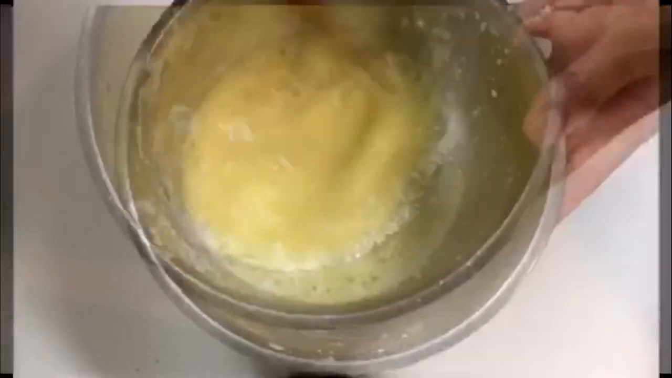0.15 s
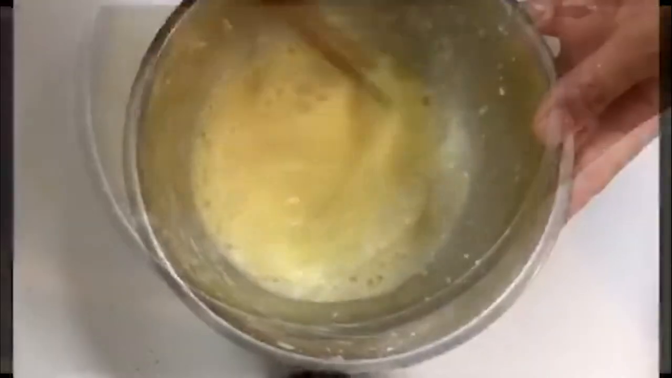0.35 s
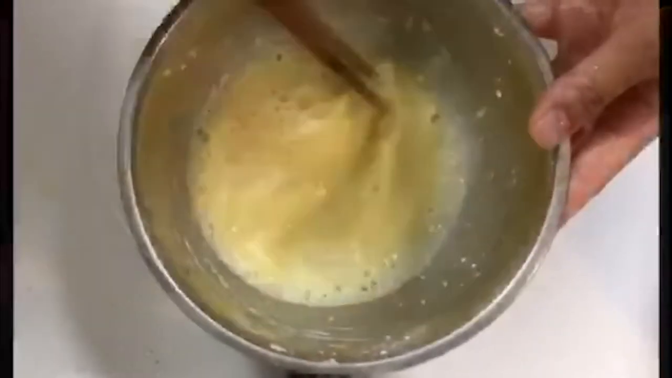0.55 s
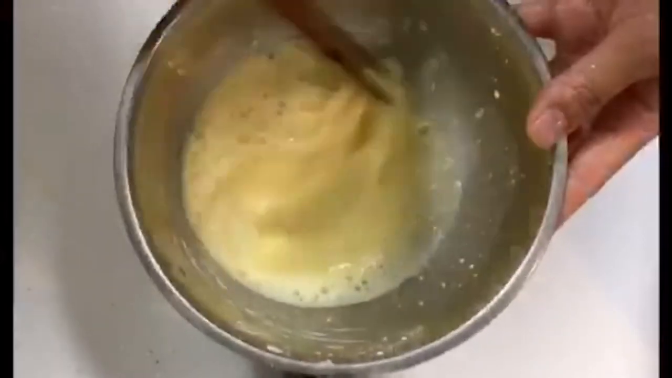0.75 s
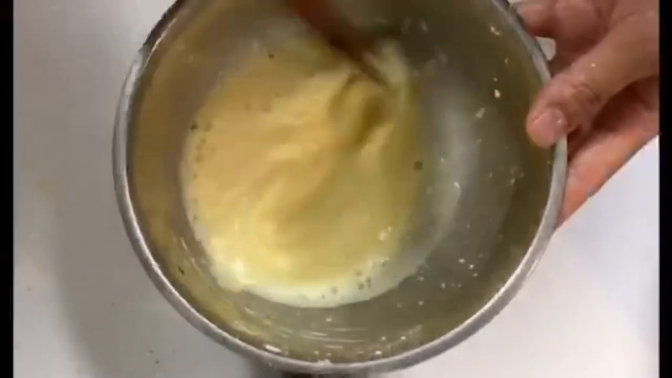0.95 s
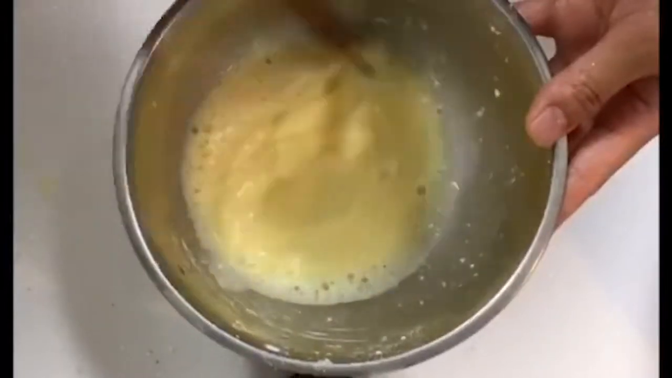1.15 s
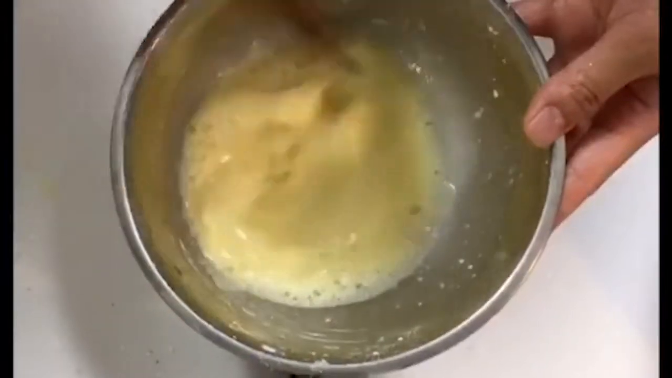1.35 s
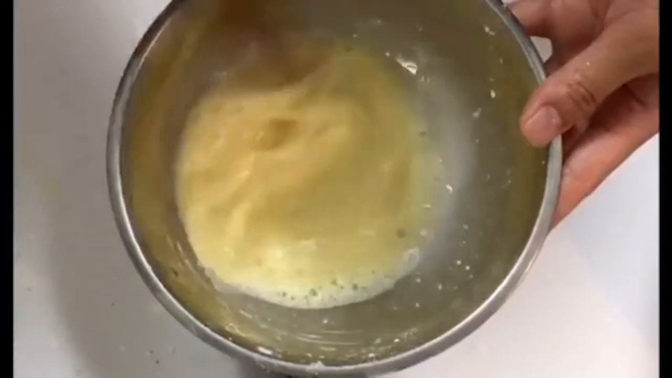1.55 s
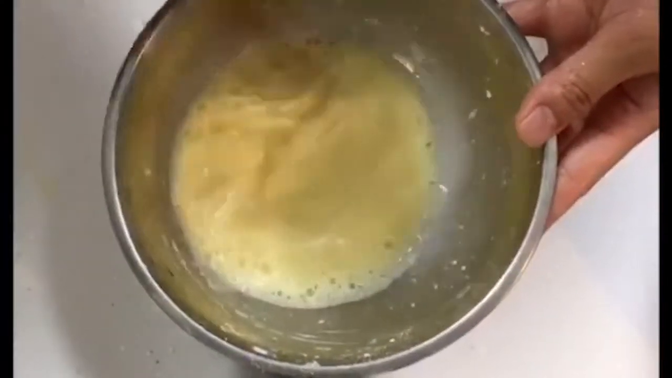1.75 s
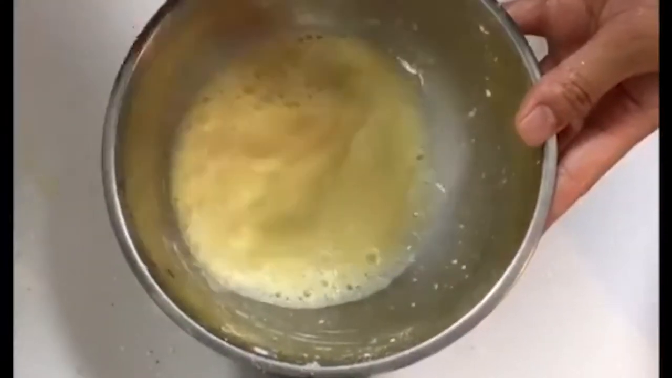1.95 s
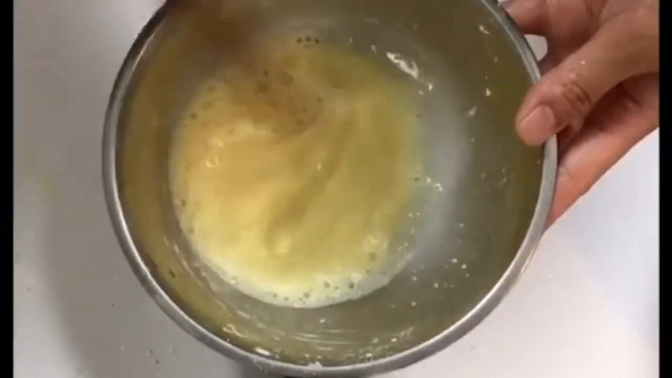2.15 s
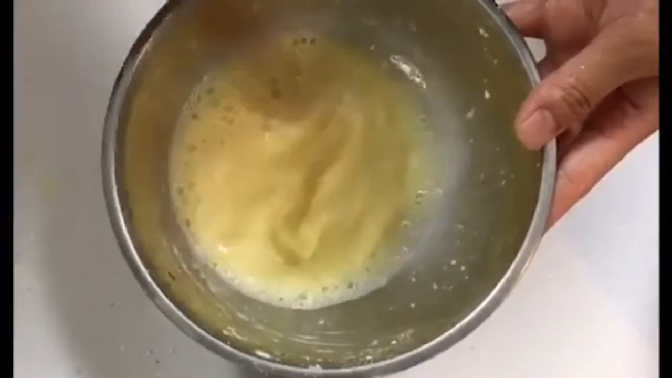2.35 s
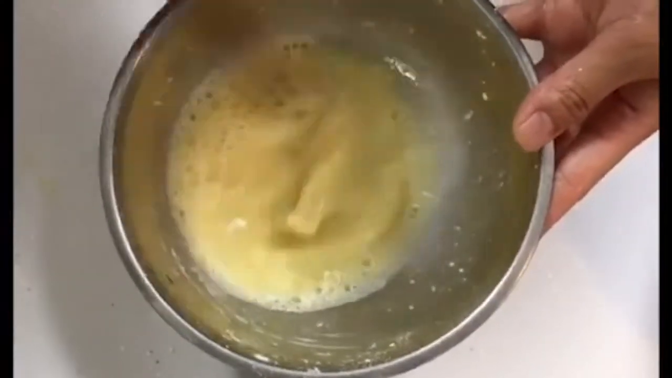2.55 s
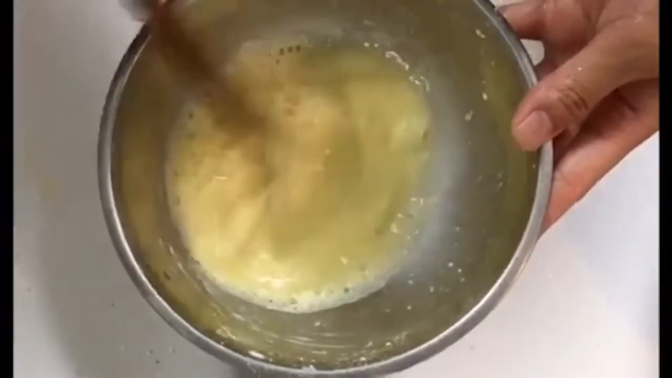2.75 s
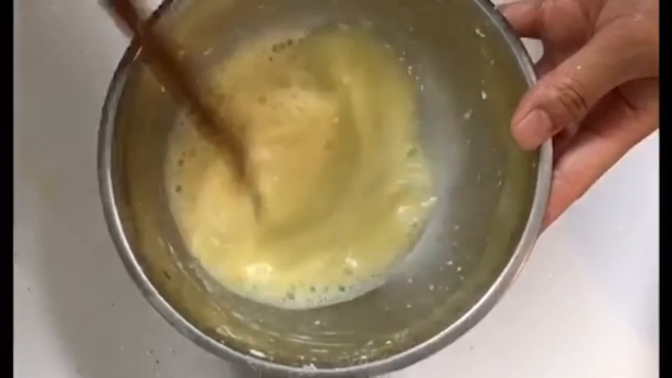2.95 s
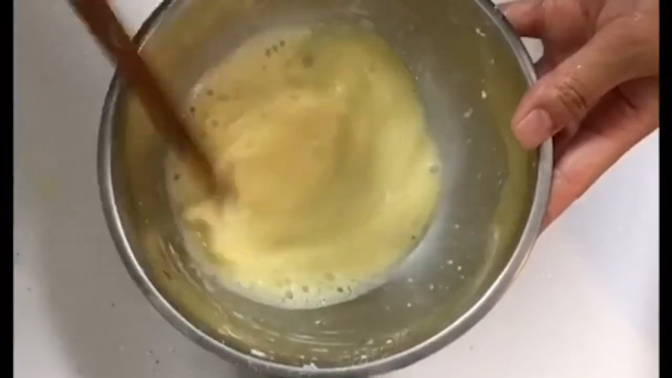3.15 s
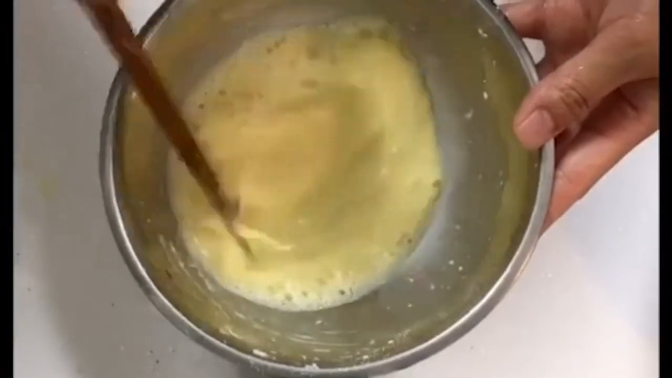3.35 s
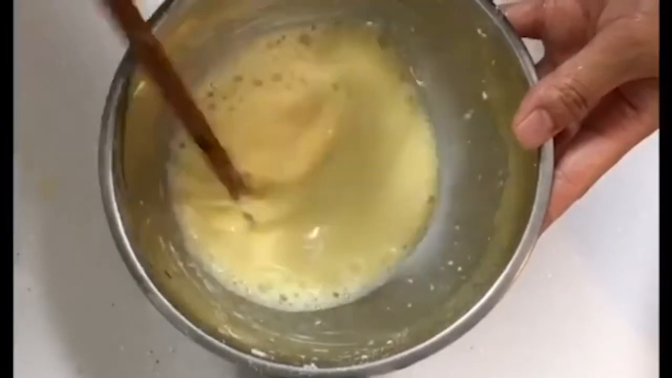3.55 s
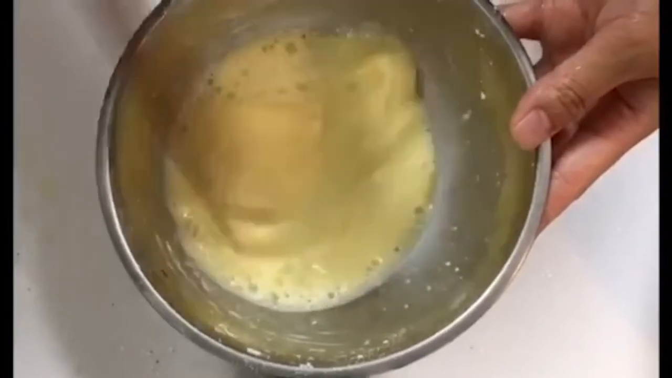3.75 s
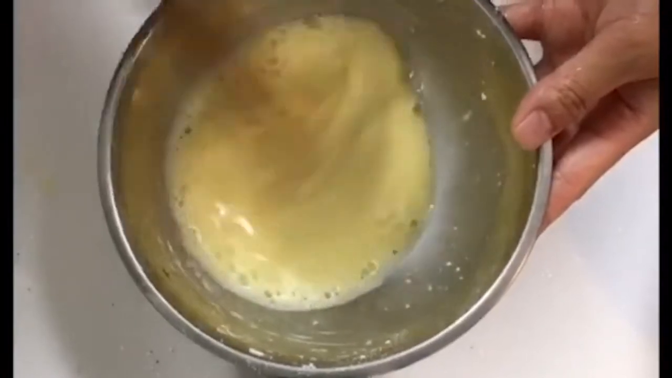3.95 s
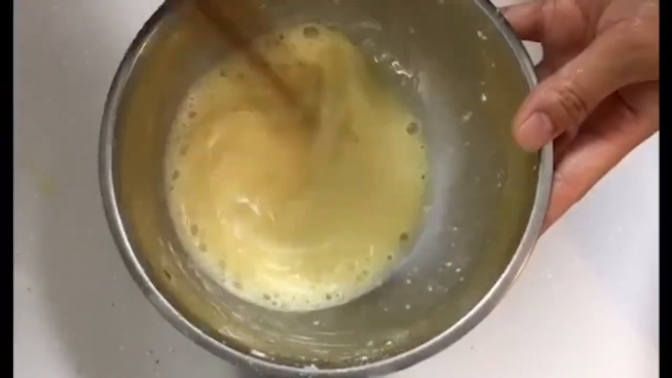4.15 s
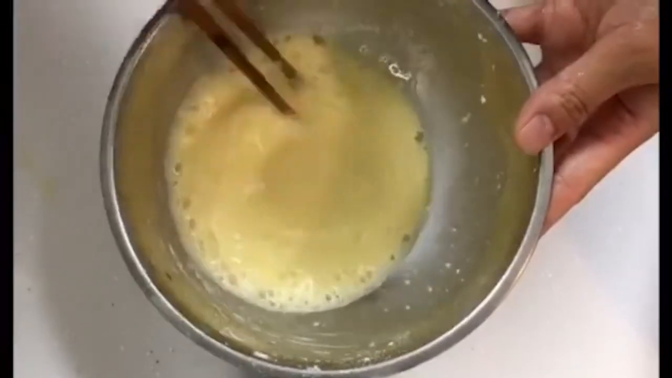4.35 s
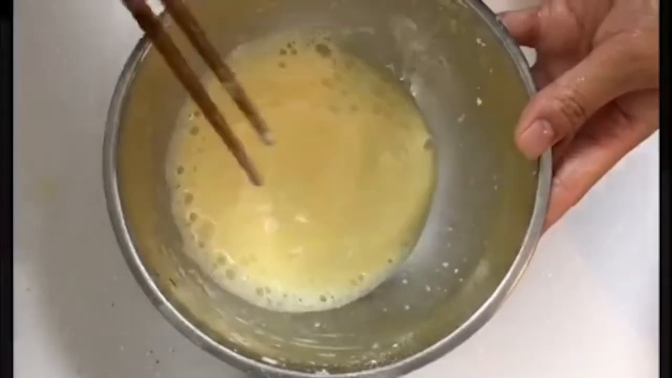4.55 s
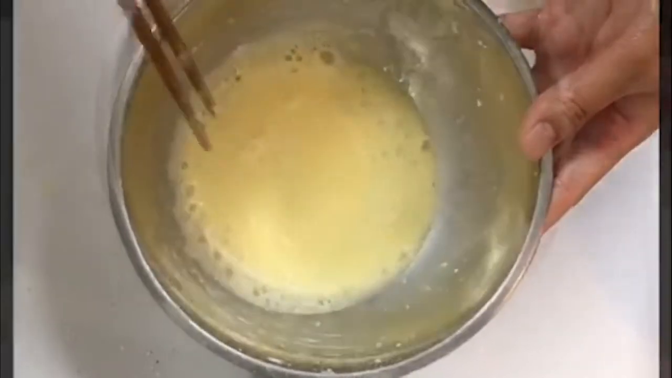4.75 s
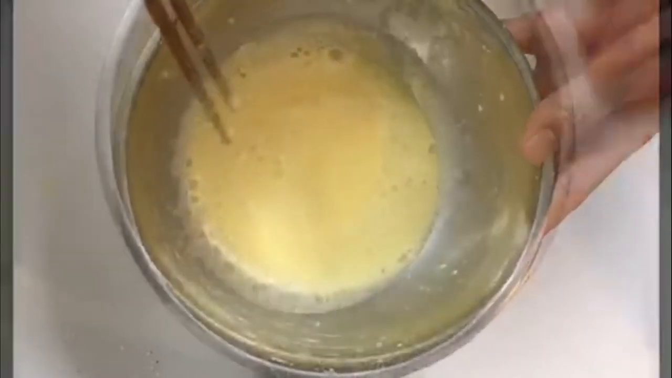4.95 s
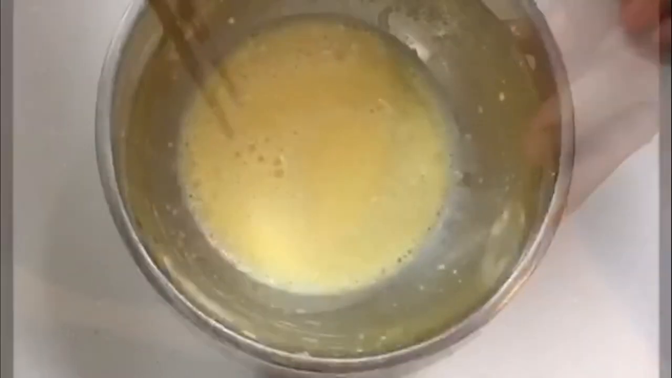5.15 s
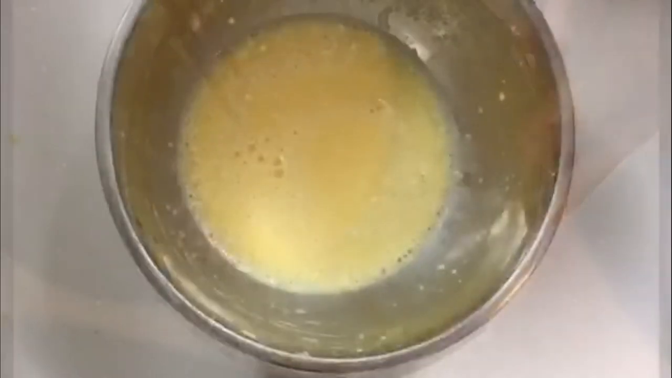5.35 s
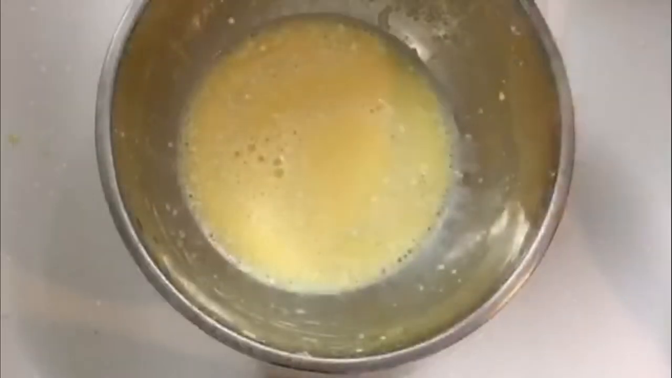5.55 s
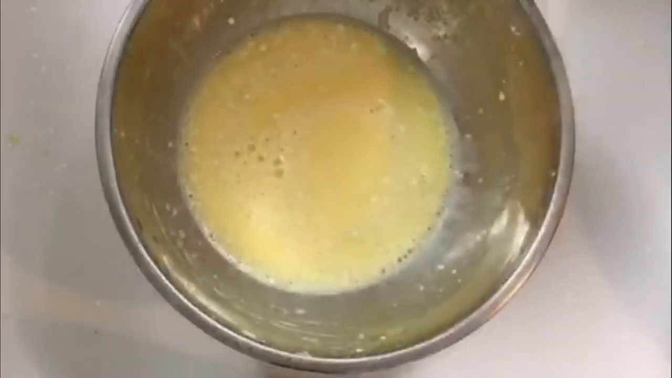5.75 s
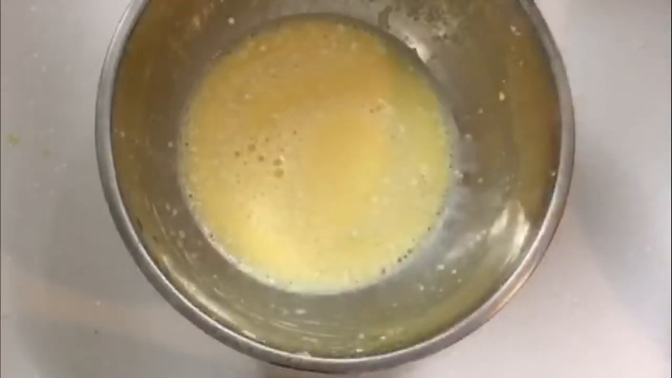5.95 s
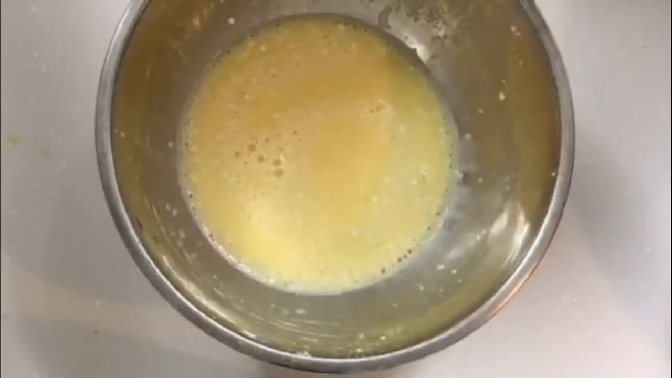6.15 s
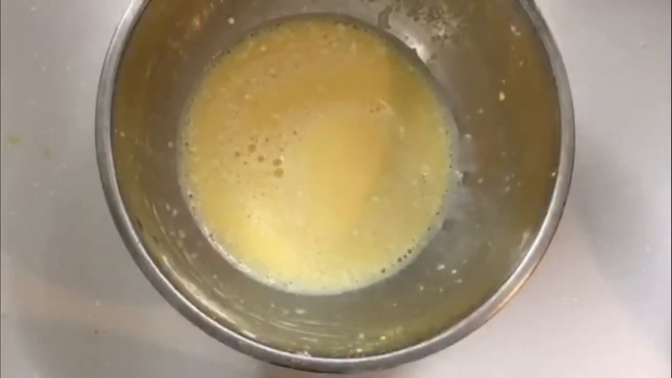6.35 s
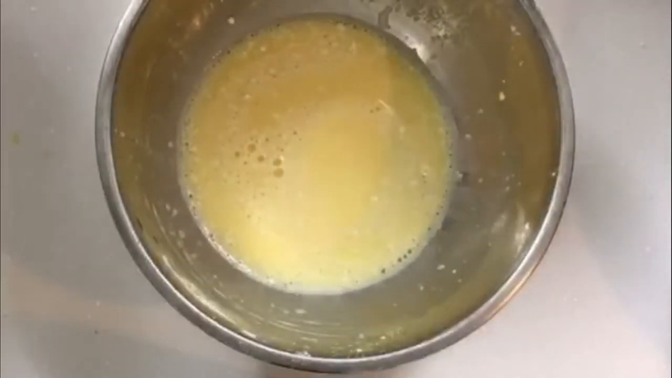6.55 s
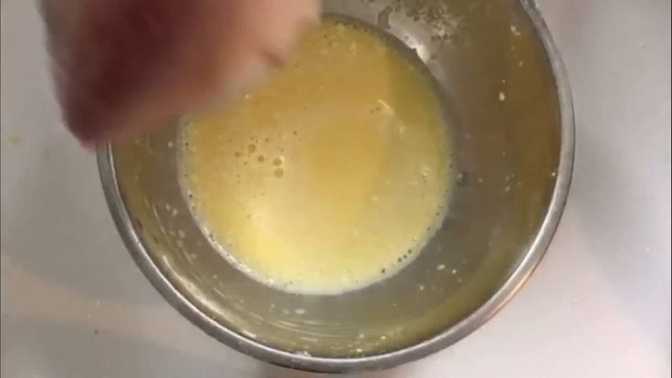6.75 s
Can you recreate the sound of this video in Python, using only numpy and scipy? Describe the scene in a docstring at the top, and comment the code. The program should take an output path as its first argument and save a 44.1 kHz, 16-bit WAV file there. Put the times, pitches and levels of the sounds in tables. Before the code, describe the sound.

Close, quick clacking of chopsticks against a damped metal bowl of wet batter for four seconds, then a few soft taps and quiet kitchen hum.

```python
"""A small kitchen: wooden chopsticks beat thin batter in a hand-held steel bowl, heard from close by.
In each turn the tips knock the damped bowl on entering, plunging and lifting out: noise cracks, ringing modes, low booms.
Folded-in air plops as gliding tones; the wet film snaps and crackles in short noise clicks over a swish of filtered noise.
The beating stops, a few light wooden taps follow, and an appliance hums on over rumble, hiss and one faint brushing."""
import sys
import numpy as np
from scipy import signal
from scipy.fft import rfft, irfft, next_fast_len
from scipy.io import wavfile
from scipy.ndimage import map_coordinates

SR = 44100
rng = np.random.default_rng(int(sys.argv[2]) if len(sys.argv) > 2 else 0)


def wav_out(sig):
    """Save sig, one row per channel (or a flat mono array), as 16-bit PCM at SR to the path in sys.argv[1]."""
    wavfile.write(sys.argv[1], SR, np.round(np.clip(np.atleast_2d(sig).T, -1, 1) * 32767).astype(np.int16))


N = 299868  # length of the scene in samples
T = np.arange(SR // 3) / SR  # the life of one sound [s]

# turns of the chopsticks; in each they enter against the wall, plunge to the bottom and lift out along the far side:
# (time [s], entry level [dB], plunge delay [s], plunge level [dB], lift delay [s], lift level [dB],
#  counter thud level [dB]); the levels are relative
TURNS = [(0.068, -37.5, .048, -34.5, 0.1, -36.5, -45.5), (0.266, -46, 0.055, -29.5, 0.11, -40, -40),
         (0.464, -37.5, 0.051, -30, 0.12, -34, -43.5), (0.661, -30.5, 0.044, -40.5, 0.11, -28, -46),
         (0.859, -29.5, 0.057, -26.5, 0.11, -32.5, -43), (1.067, -32, .055, -29.5, 0.1, -37, -42.5),
         (1.276, -30, .054, -29.5, 0.11, -43, -47), (1.475, -29, 0.07, -32, 0.14, -48, -48),
         (1.681, -29.5, 0.062, -30.5, 0.14, -37.5, -45.5), (1.881, -28, 0.061, -33, 0.12, -28, -41),
         (2.096, -29.5, .054, -30.5, 0.11, -31, -39), (2.293, -31, .043, -29.5, 0.11, -30.5, -41.5),
         (2.495, -33, 0.07, -40, 0.11, -29, -41), (2.700, -33.5, 0.058, -37, .123, -28, -43),
         (2.931, -32.5, 0.049, -40, .110, -39.5, -42), (3.150, -31, 0.061, -29.5, 0.13, -39.5, -40),
         (3.365, -29.5, .051, -29.5, 0.12, -37, -44), (3.57, -32.5, 0.055, -41, 0.11, -35.5, -49),
         (3.796, -33.5, .049, -31.5, 0.088, -43, -37.5), (4.011, -31.5, 0.054, -40.5, 0.15, -57, -48)]


def amp(db):
    """Turn decibels into a gain."""
    return 10 ** (np.asarray(db) / 20)


def unit(x):
    """Scale a sound to rms 1."""
    return x / np.sqrt(np.mean(x ** 2) + 1e-20)


def onset_unit(x):
    """Scale a hit so that its first 20 ms have rms 1."""
    return x / np.sqrt(np.mean(x[:SR // 50] ** 2) + 1e-20)


def along(points, hz):
    """Read a curve of (frequency [Hz], value) points on a log frequency axis."""
    f, v = np.transpose(points)
    return np.interp(np.log(hz + 1), np.log(f + 1), v)


def fade(t60):
    """Die away exponentially, by 60 dB in t60 seconds."""
    return amp(-60 * T / t60)


def coloured(x, spectrum):
    """Filter a sound to a given spectrum, with no sound ahead of its cause (minimum phase)."""
    m = 2 * next_fast_len(len(x) // 2 + 2048)
    gain = amp(along(spectrum, np.fft.rfftfreq(m, 1 / SR)))
    cepstrum = irfft(np.log(gain))
    # folding the cepstrum onto positive times makes the filter causal
    cepstrum[1:m // 2] *= 2
    cepstrum[m // 2 + 1:] = 0
    response = np.exp(rfft(cepstrum))
    return irfft(rfft(x, m) * response)[:len(x)]


def wobble(rate, size):
    """Draw a smooth random curve with rate knots a second."""
    knots = rng.standard_normal(int(size * rate / SR) + 4)
    return map_coordinates(knots, [np.arange(size) * rate / SR])


def add(track, s, sound):
    """Mix a sound into the track at time s."""
    part = track[max(round(s * SR), 0):][:len(sound)]
    part += sound[:len(part)]


def burst(spectrum, t60, tail_db, tail_t60):
    """A crack of noise followed by its weaker, longer scatter from nearby surfaces."""
    envelope = fade(t60) + amp(tail_db) * fade(tail_t60)
    return coloured(rng.standard_normal(len(T)) * envelope, spectrum)


def ring(modes, spread_db, detune):
    """Modes (decaying sines) struck at a new spot and under a new load each time."""
    hz, db, t60 = np.transpose(modes)[:, :, None]
    size, shift, phase = rng.standard_normal((3, len(modes), 1))
    waves = np.sin(2 * np.pi * (hz * (1 + detune * shift) * T + phase))
    levels = amp(db + spread_db * size)
    soft_start = 1 - fade(0.0036)
    return onset_unit(np.sum(levels * fade(t60) * waves, axis=0) * soft_start)


def boom(hz, rise, t60, waver):
    """A low resonance under a shifting load: it swells for a few cycles, then dies; envelope peak 1."""
    swell = (1 - np.exp(-(T / rise) ** 2)) * fade(t60)
    pitch = hz * (1 + waver * wobble(70, len(T)))
    return swell / swell.max() * np.sin(2 * np.pi * np.cumsum(pitch) / SR)


def bubble(hz, life, glide, waver):
    """An air pocket rings with an unsteady, rising pitch; its damping grows as it collapses."""
    age = T / life
    pitch = hz * (1 + glide * (np.minimum(age, 1) - .15) + waver * wobble(520, len(T)))
    dying = amp(-28 * age - 66 * age ** 2)  # 94 dB down at the end of its life
    return np.sin(2 * np.pi * np.cumsum(pitch) / SR) * dying * (1 - fade(0.004))


def tilted(rows, slope):
    """Harder contacts are brighter: tilt the level column around 1.5 kHz, in dB per octave."""
    return [(hz, db + slope * np.log2(hz / 1500), *rest) for hz, db, *rest in rows]


def knocks():
    """Every contact finds the bowl seated a little differently and under a new load of batter."""
    bottom_hz, load_spread = 346, 0.032  # pitch of the bottom, and its relative scatter as the batter shifts
    thud_spread_db = 1.5  # the bowl sits more or less firmly
    out = np.zeros(N)
    for s, db, bottom_db, thud_db, hardness in contacts():
        seat, load = rng.standard_normal(2)
        loaded_hz = bottom_hz * (1 + load_spread * load)
        out += knock(s, db, bottom_db, thud_db + thud_spread_db * seat, hardness, loaded_hz)
    return out


def contacts():
    """List three contacts a turn: (time [s], wall, bottom and thud levels [dB], hardness [dB per octave])."""
    # the plunges soften as the hand slackens: (time [s], hardness [dB per octave])
    plunge_hardness = [(0, 1.5), (3.35, 0), (3.62, -8.5), (4.1, -4)]
    # how much each contact also stirs the other part of the bowl
    entry_flex_db, plunge_wall_db, lift_flex_db = -5.5, -1.5, -12.5
    lift_thud_db = -12  # the lifting tips hardly press the bowl down
    rows = []
    for s, entry_db, plunge_s, plunge_db, lift_s, lift_db, thud_db in TURNS:
        hardness = np.interp(s + plunge_s, *np.transpose(plunge_hardness))
        rows += [(s, entry_db, entry_db + entry_flex_db, min(thud_db, entry_db), 0),
                 (s + plunge_s, plunge_db + plunge_wall_db, plunge_db, thud_db, hardness),
                 (s + lift_s, lift_db, lift_db + lift_flex_db, thud_db + lift_thud_db, 0)]
    return rows


def knock(s, db, bottom_db, thud_db, hardness, bottom_hz):
    """A contact rings the wall, flexes the loaded bottom and thuds into the counter."""
    # spectrum of wood meeting steel: (frequency [Hz], relative level [dB])
    contact_spectrum = [(60, -31.5), (200, 1.5), (400, -5), (600, -11.5), (900, 7), (1500, -1.5), (2100, 1),
                        (3000, -3.5), (4500, -10.5), (7000, -23), (16000, -43.5)]
    # steel wall, damped by batter and hand: (frequency [Hz], relative level [dB], time to fall 60 dB [s])
    wall_modes = [(453.3, -2, 0.13), (866, -3.5, 0.21), (999, -4, 0.11), (1188, 3, 0.081),
                  (1364, -4.5, 0.1), (1516, -15, 0.29), (1810, -21.5, 0.11), (2031, 2.5, 0.072),
                  (2260, -11.5, .11), (2809, 3.5, 0.049), (3520, -10.5, .09), (3810, -14, .09)]
    # spectrum of the bottom under its load of batter: (frequency [Hz], relative level [dB])
    loaded_spectrum = [(100, -42.5), (220, -6), (300, 0.5), (370, 3.5), (470, -8), (600, -18), (750, -1),
                       (1100, -40), (2500, -66)]
    out = np.zeros(N)
    colour = tilted(contact_spectrum, hardness)
    crack = onset_unit(burst(colour, t60=0.031, tail_db=-32.5, tail_t60=0.2))
    wall = ring(tilted(wall_modes, hardness), spread_db=4.0, detune=0.0151)
    add(out, s, amp(db) * (amp(-7.0) * crack + amp(-7.0) * wall))
    # the second chopstick lands a moment after the first
    second = onset_unit(burst(colour, t60=0.012, tail_db=-20, tail_t60=0.13))
    add(out, s + .003 + 0.0072 * rng.random(), amp(db - 12.0) * second)
    flex = boom(bottom_hz, rise=.012, t60=.08, waver=.04)
    add(out, s, amp(bottom_db + 2.0) * flex)
    slap = onset_unit(burst(loaded_spectrum, t60=.08, tail_db=-17, tail_t60=0.19))
    add(out, s + 0.0038, amp(bottom_db - 13.5) * slap)
    thud = boom(hz=92, rise=.014, t60=.15, waver=.11)
    add(out, s, amp(thud_db + 6.0) * thud)
    return out


def plops():
    """Loud air pockets open; each turn also brings a splash at the entry and, but for the last, a weak wake."""
    # the loudest air pockets opening in the batter: (time [s], relative level [dB], pitch [Hz])
    pockets = [(0.1725, -20, 1985), (0.4667, -26, 1260), (0.6603, -13.5, 2280), (0.7769, -14.5, 2810),
               (0.7776, -15.5, 2100), (0.8116, -29.5, 1220), (0.8582, -14.5, 3390), (0.864, -23, 1186),
               (0.952, -26.5, 2280), (0.9752, -20.5, 2150), (1.2194, -23, 1200), (1.3064, -23.5, 2230),
               (1.423, -17, 992), (1.634, -30, 1590), (1.7756, -24.5, 2600), (1.8189, -27.5, 1313),
               (1.9988, -16.5, 1824), (2.018, -24.5, 1620), (2.039, -29, 1320), (2.0669, -23.5, 1340),
               (2.2053, -15, 2690), (2.2281, -22, 1000), (2.4044, -18.5, 2080), (2.6018, -10.5, 2854),
               (2.6058, -15, 2105), (2.6993, -23, 1970), (2.7092, -19.5, 1223), (2.9001, -30, 1314),
               (2.9317, -21.5, 1020), (3.121, -24, 3400), (3.3073, -17, 1199), (3.4994, -23, 2800),
               (3.7248, -30.5, 1830), (3.7742, -24, 2900)]
    splash_db, splash_hz = 7.5, 3453  # small pockets that the entering tips drive under; against the entry level
    # weak pockets behind the tips: start after the entry, span, top level
    wake_s, wake_length_s, wake_db = .095, .065, -28.5
    out = np.zeros(N)
    for s, db, hz in pockets:
        add(out, s, amp(db - 1.0) * plop(hz, length=1))
    for s, entry_db, *_ in TURNS:
        hz = splash_hz * np.exp(0.21 * rng.standard_normal())
        add(out, s, amp(entry_db + splash_db) * plop(hz, length=0.82))
    for s, *_ in TURNS[:-1]:
        for delay, pitch, size in rng.random((2, 3)):
            weak = plop(1100 * 2.5 ** pitch, length=.7)
            add(out, s + wake_s + wake_length_s * delay, amp(wake_db - 10 * size) * weak)
    return out


def plop(hz, length):
    """A pocket of air, opened by a little muffled tear; the larger it is, the lower and longer it rings."""
    life_s, damping = 0.055, 1.3  # life of a 1 kHz pocket; smaller pockets die faster by this power of pitch
    around = [(hz / 4, -22), (hz / 2.0, -5), (hz * 1.2, 0), (hz * 3, -10), (hz * 6, -30)]
    tear = onset_unit(burst(around, t60=0.0072, tail_db=-10.0, tail_t60=0.027))
    # the batter absorbs the tear's treble above 6 kHz
    tear = signal.sosfilt(signal.butter(2, 6000, fs=SR, output="sos"), tear)
    life = length * life_s * (1000 / hz) ** damping
    return bubble(hz, life, glide=0.046, waver=0.029) + amp(-22.5) * tear


def snaps():
    """The film snaps loudly once or more in most turns, and faintly behind the tips."""
    # the sharpest snaps of the wet film: (time [s], relative level [dB])
    sharpest = [(0.118, -21.5), (0.1772, -22), (0.3237, -27), (0.388, -30.5), (0.5865, -28.5),
                (0.7043, -29), (0.7836, -23), (0.8976, -19), (1.041, -29.5), (1.0976, -20.5),
                (1.1226, -21.5), (1.3325, -21), (1.5232, -25.5), (1.5482, -18), (1.6838, -24.5),
                (1.7438, -18.5), (1.94, -16.5), (1.9583, -22.5), (2.1348, -18.5), (2.2057, -26),
                (2.3584, -25.5), (2.5596, -20.5), (2.6024, -22.5), (2.7776, -27), (2.9464, -26.5),
                (2.9823, -20.5), (3.2139, -14.5), (3.4179, -19), (3.5947, -31), (3.7746, -30),
                (3.8461, -23), (4.044, -31.5), (4.155, -32.5)]
    out = np.zeros(N)
    for s, db in sharpest:
        add(out, s, snap(db + 2.5))
    for s, *_ in TURNS[:-1]:
        for delay, size in rng.random((2, 2)):
            add(out, s + .06 + 0.096 * delay, snap(-32 - 12 * size))
    return out


def snap(db):
    """A very short bright click that scatters around inside the bowl; the sharper it is, the thinner."""
    # spectra of the bright click and of its body: (frequency [Hz], relative level [dB])
    bright_spectrum = [(1500, -14), (4000, 4), (5600, 8.5), (7000, 4.5), (8200, 7), (9600, 7.5), (10800, 3),
                       (11700, 7), (13000, 3.5), (15500, -2.5), (17000, -27.5)]
    body_spectrum = [(300, -32.5), (900, 0), (2500, -5.5), (4000, 6), (5500, -9.5), (8000, -29),
                     (16000, -43.5)]
    top = onset_unit(burst(bright_spectrum, t60=0.0078, tail_db=-11, tail_t60=0.069))
    body = onset_unit(burst(body_spectrum, t60=0.0073, tail_db=-12.5, tail_t60=0.032))
    # the body loses 0.81 dB against the top for each dB of snap level, with some scatter
    body_db = -10.5 - 0.81 * (db + 21) + 3 * rng.standard_normal()
    return amp(db - 19.5) * (top + amp(body_db) * body)


def crackle():
    """After each stroke the torn film closes in tiny clicks and small bubbles."""
    out = np.zeros(N)
    for s, db, *_ in contacts():
        for delay, pitch, size in rng.random((4, 3)):
            hz = 1500 * 6 ** pitch
            colour = [(hz / 4, -30), (hz / 2, -8), (hz, 0), (hz * 1.5, -9), (hz * 3, -22)]
            click = onset_unit(burst(colour, t60=0.0036, tail_db=-22, tail_t60=0.043))
            add(out, s + .012 + 0.066 * delay, amp(db - 24.0 - 10 * size) * click)
        for delay, pitch, size in rng.random((3, 3)):
            hz = 950 * 3.2 ** pitch
            small = bubble(hz, 28 / hz, glide=.16, waver=.05)  # lives about 28 cycles
            add(out, s + .008 + .055 * delay, amp(db + 1 - 11 * size) * small)
    return out


def batter():
    """The batter swishes in uneven folds and churns, then comes to rest."""
    # stirring: (time [s], relative wet swish level [dB], relative low churning level [dB])
    stirring = [(0.0, -41.5, -52.5), (1.1, -47, -52), (1.48, -45.5, -53.5), (2.03, -47, -51),
                (3.01, -53, -53), (3.39, -46, -49.5), (4.31, -63, -57.5), (4.7, -60, -64)]
    # spectra of the swish and of the churning: (frequency [Hz], relative level [dB])
    squelch_spectrum = [(150, -5), (340, 4.5), (600, -5.5), (1000, -4), (2200, -4.5), (4000, -12),
                        (7000, -17.5), (14000, -21), (17000, -43.5)]
    churn_spectrum = [(25, -29), (50, -2.5), (90, -8), (125, 0.5), (170, -24), (300, -30), (900, -50.5)]
    s, swish_db, churn_db = np.transpose(stirring)
    now = np.arange(N) / SR
    moving = np.interp(now, [4.15, 4.7], [1, 0])
    # fine grain, and lumps as the swish comes in uneven folds
    unevenness_db = 3.5 * wobble(400, N) + 4 * wobble(28, N)
    wet = unit(coloured(rng.standard_normal(N) * amp(unevenness_db), squelch_spectrum))
    swish = amp(np.interp(now, s, swish_db) - 10) * wet
    low = unit(coloured(rng.standard_normal(N), churn_spectrum))
    churn = amp(np.interp(now, s, churn_db) - 3.5) * low
    return moving * (swish + churn)


def settle():
    """A last soft knock; as the tips lift, the middle wall modes ring on; then the bowl rocks softly once."""
    out = knock(4.312, db=-35.5, bottom_db=-32, thud_db=-46, hardness=-1.93, bottom_hz=332)
    add(out, 4.3196, snap(db=-30))
    # (frequency [Hz], relative level [dB], time to fall 60 dB [s])
    free_modes = [(1362, 0, .11), (1540, 6, .04), (1630, -1, .11), (1745, -5, .1), (1954, -7, .09)]
    free_wall = ring(free_modes, spread_db=1, detune=.003)
    add(out, 4.314, amp(-38.5) * free_wall)
    rock = amp(-48.5) * boom(hz=338, rise=0.019, t60=0.13, waver=0.063)
    rock += amp(-45.5) * boom(hz=117.5, rise=0.045, t60=0.16, waver=0.13)
    add(out, 4.475, rock)
    return out


def taps():
    """Dry wood cracks and rings, tapped lightly after the beating; the first tap skids on with a tiny snap."""
    # light wooden taps: (time [s], relative level [dB], extra click above 6 kHz [dB])
    light_taps = [(4.793, -38, -5.5), (5.0151, -37, 3), (5.186, -45, -3), (5.287, -61.5, -9),
                  (5.421, -57, -1.5)]
    # spectrum of the tap's crack: (frequency [Hz], relative level [dB])
    crack_spectrum = [(150, -40), (280, -9), (400, -3), (700, -4), (1150, -2.5), (2000, -9.5),
                      (3000, -11.5), (4000, -9.5), (5500, -26), (6800, -27.5), (9200, -15), (11000, -31),
                      (16000, -34.5)]
    # the tapped wood: (frequency [Hz], relative level [dB], time to fall 60 dB [s])
    wood_modes = [(338, -7, 0.08), (413, -4.5, 0.092), (502, -18, 0.084), (877, -4, 0.062),
                  (1138, 8, 0.033), (1367, -10, 0.17), (1866, -5, 0.073), (2610, -15, 0.1),
                  (2620, 1, 0.028), (2960, -3, 0.076), (3644, -2.5, 0.057), (4200, -7.5, 0.076),
                  (8260, -6, 0.051), (8500, -19, 0.038), (9550, 0, 0.032)]

    def sharpened(rows, click_db):
        """Raise or lower the treble points of a table."""
        return [(hz, level + click_db * (hz > 6000), *rest) for hz, level, *rest in rows]

    out = np.zeros(N)
    for s, db, click_db in light_taps:
        colour = sharpened(crack_spectrum, click_db)
        crack = onset_unit(burst(colour, t60=0.018, tail_db=-14.0, tail_t60=0.19))
        wood = ring(sharpened(wood_modes, click_db), spread_db=1.5, detune=.004)
        add(out, s, amp(db) * (amp(-2) * crack + wood))
    add(out, 4.8074, snap(db=-32))
    return out


def kitchen(x):
    """Short room tail of fading noise, drawn anew each quarter second as the hands and bowl move."""
    # how long the room rings: (frequency [Hz], time to fall 60 dB [s])
    room_decay = [(100, 1), (400, 0.32), (2000, 0.31), (8000, 0.32), (16000, 0.087)]
    out = np.zeros(N)
    hop = SR // 4
    for start in range(0, N, hop):
        hz, t, z = signal.stft(rng.standard_normal(len(T)), SR, nperseg=256)
        decay = amp(-60 * t / along(room_decay, hz)[:, None])
        tail = signal.istft(z * decay, SR, nperseg=256)[1]
        tail = tail[:len(T)] * (1 - fade(0.017))
        echo = signal.fftconvolve(x[start:start + hop], tail / np.linalg.norm(tail))
        add(out, start / SR, echo)
    return out


def background():
    """Filtered noise makes room rumble, hiss and one faint brushing; unsteady sines make an appliance hum."""
    # spectra of the rumble, the hiss and the brushing: (frequency [Hz], relative level [dB])
    quiet_spectrum = [(20, -31), (33, -21.5), (50, -3.5), (75, -5.5), (110, -2.5), (160, -17.5), (240, -19),
                      (330, -22.5), (600, -25), (1200, -37.5), (3000, -55.5)]
    hiss_spectrum = [(300, -6), (900, 5), (1800, 1), (2350, 5.5), (2700, -3.5), (4000, -5.5), (9000, -11),
                     (14500, -15), (16000, -18.5)]
    brush_spectrum = [(500, -11.5), (1200, 11.5), (2200, 10.5), (4000, 2), (8500, 1), (11000, -3),
                      (16000, -7.5)]
    # appliance lines: (frequency [Hz], rms level [dB])
    hum_lines = [(97, -67), (231.5, -66.5), (2353, -82)]
    now = np.arange(N) / SR
    rumble = unit(coloured(rng.standard_normal(N), quiet_spectrum))
    air = amp(-56.5 + 0.88 * wobble(8.7, N)) * rumble
    hiss = amp(-72) * unit(coloured(rng.standard_normal(N), hiss_spectrum))
    hum = np.zeros(N)
    for hz, db in hum_lines:
        phase = 2 * np.pi * hz * now + 1.3 * wobble(6.7, N)
        hum += amp(db) * np.sqrt(2) * np.sin(phase)
    brush_db = np.interp(now, [5.1, 5.35, 5.52, 5.56, 5.63, 5.8], [-100, -68.5, -68.5, -59.5, -74, -100])
    bristle = unit(coloured(rng.standard_normal(N), brush_spectrum))
    brush = amp(brush_db + 1.4 * wobble(500, N)) * bristle
    return air + hiss + hum + brush


def scene():
    """The bowl close by, the kitchen around it."""
    near = knocks() + plops() + snaps() + crackle() + batter() + settle() + taps()
    return (near + amp(-16.0) * kitchen(near) + background())[None]


def record(dry):
    """Thin the deepest bass below 42 Hz and keep nothing from the band limit up."""
    top_hz = 16600
    m = next_fast_len(N + SR // 2)
    thin = signal.sosfilt(signal.butter(3, 42, "highpass", fs=SR, output="sos"), dry)
    in_band = np.fft.rfftfreq(m, 1 / SR) < top_hz
    return irfft(rfft(thin, m) * in_band, m)[:, :N]


dry = scene()
out = record(dry)
wav_out(out)
```